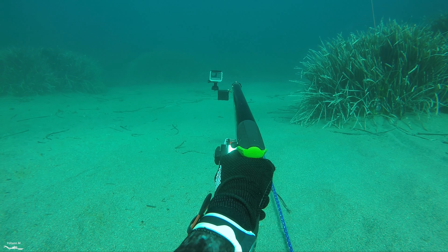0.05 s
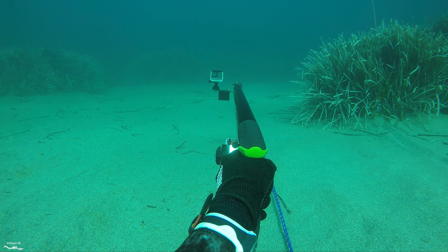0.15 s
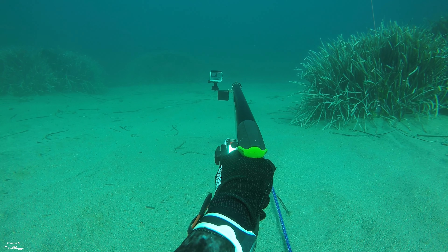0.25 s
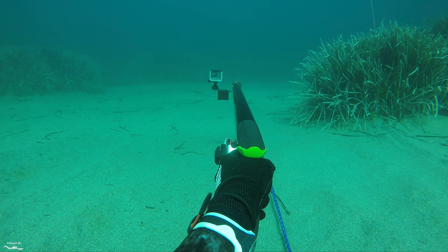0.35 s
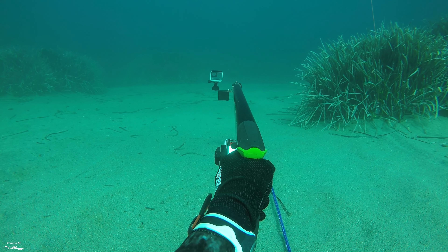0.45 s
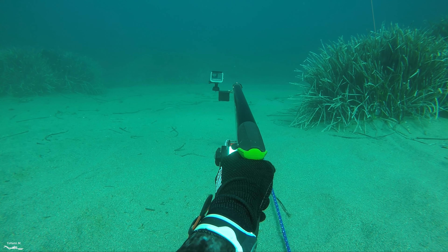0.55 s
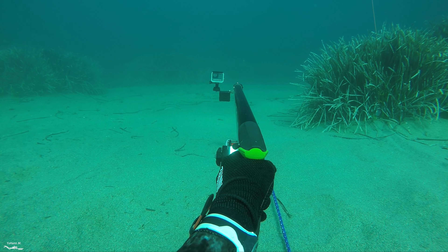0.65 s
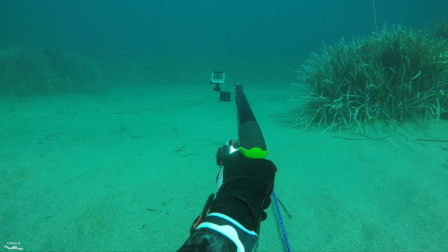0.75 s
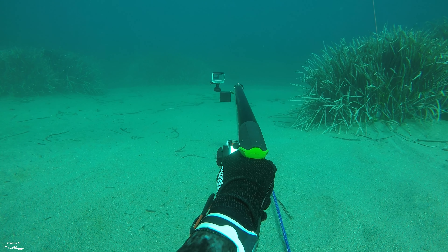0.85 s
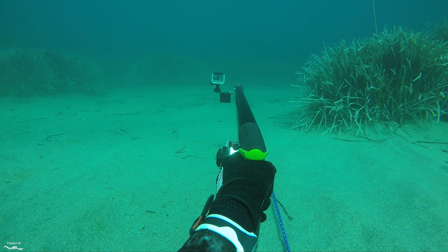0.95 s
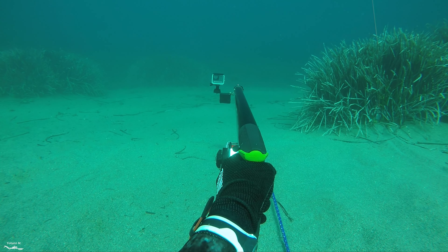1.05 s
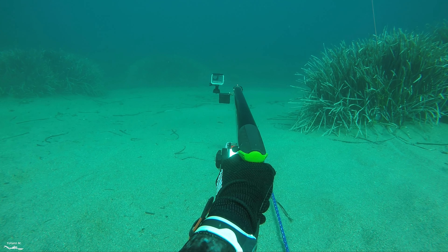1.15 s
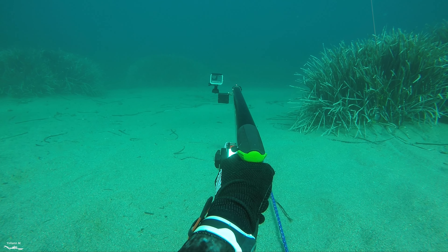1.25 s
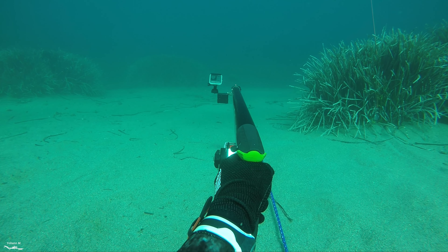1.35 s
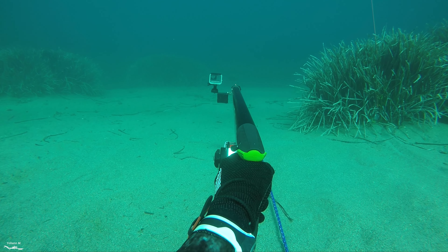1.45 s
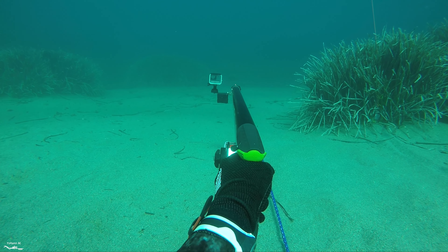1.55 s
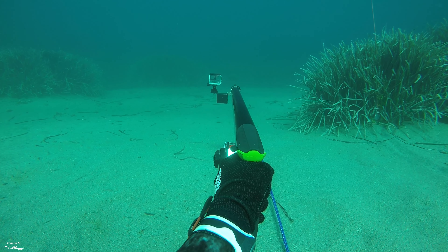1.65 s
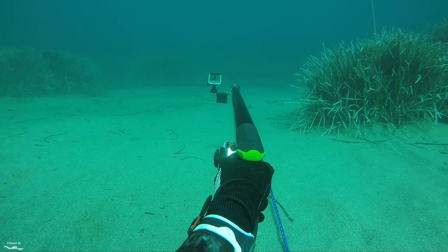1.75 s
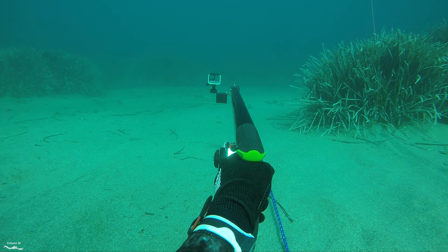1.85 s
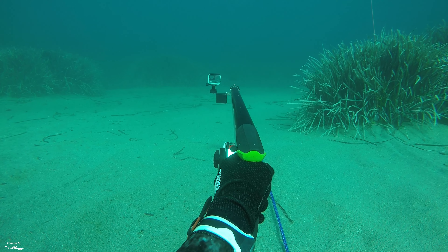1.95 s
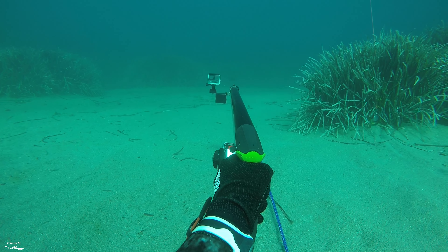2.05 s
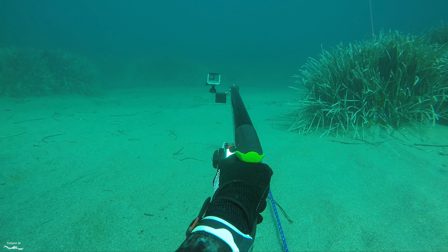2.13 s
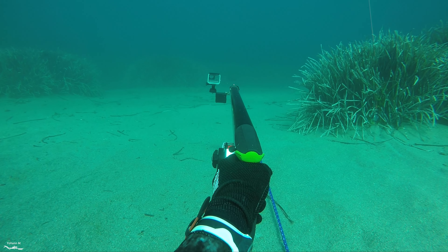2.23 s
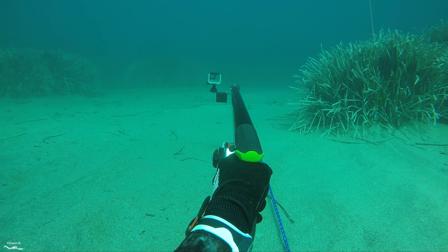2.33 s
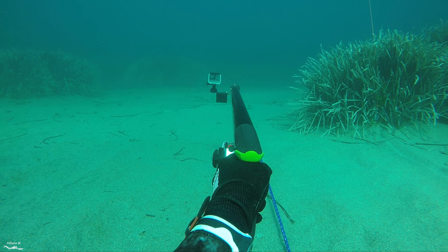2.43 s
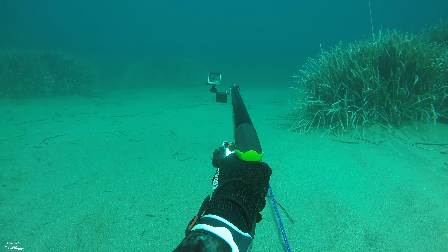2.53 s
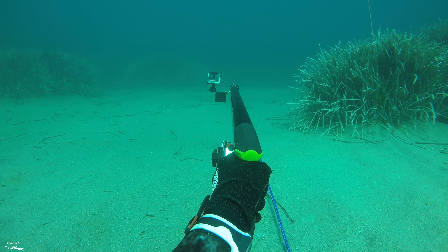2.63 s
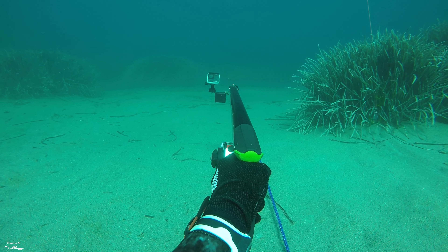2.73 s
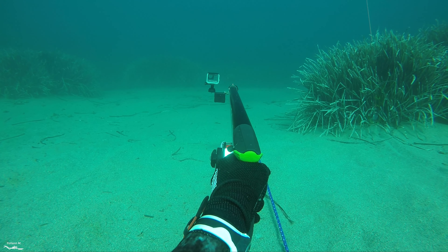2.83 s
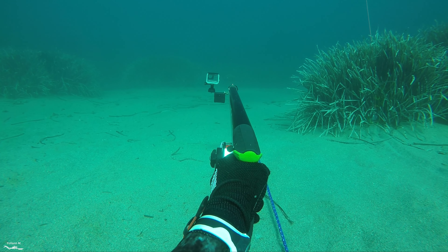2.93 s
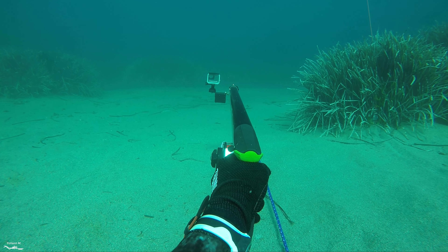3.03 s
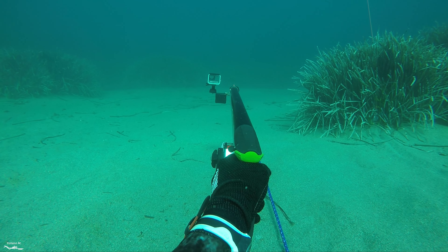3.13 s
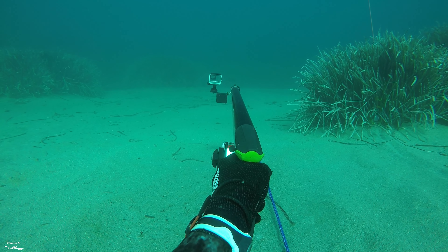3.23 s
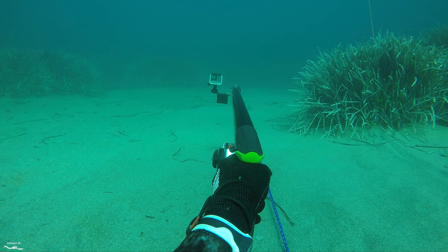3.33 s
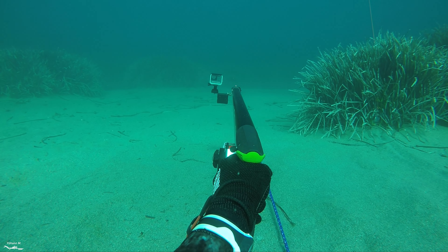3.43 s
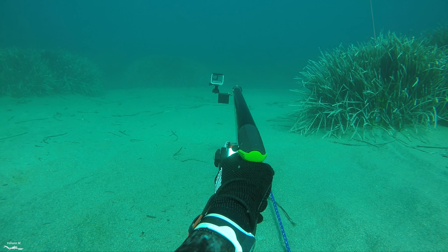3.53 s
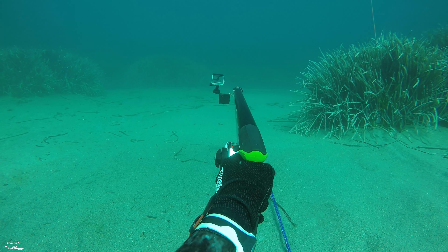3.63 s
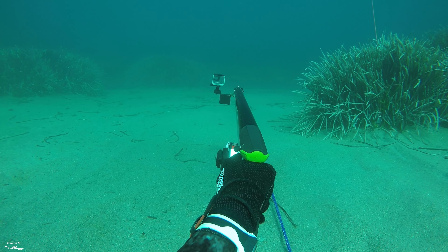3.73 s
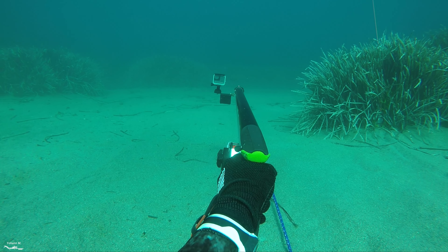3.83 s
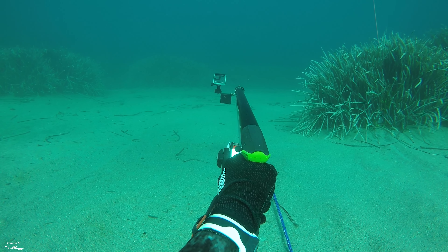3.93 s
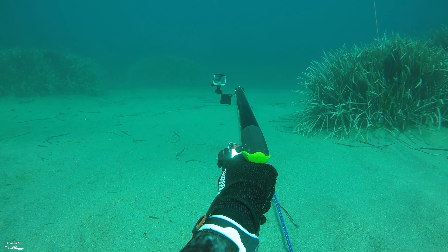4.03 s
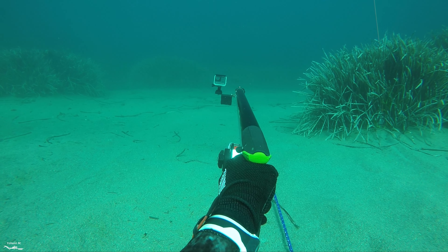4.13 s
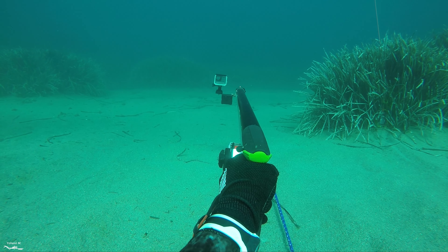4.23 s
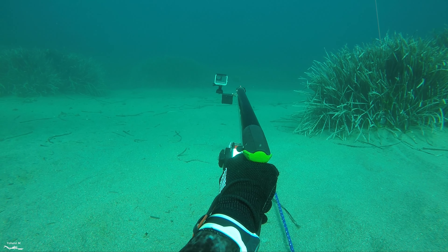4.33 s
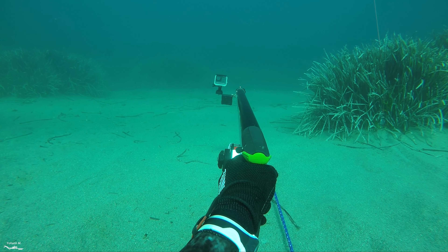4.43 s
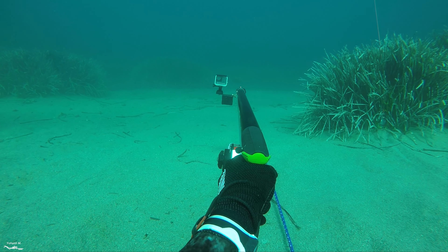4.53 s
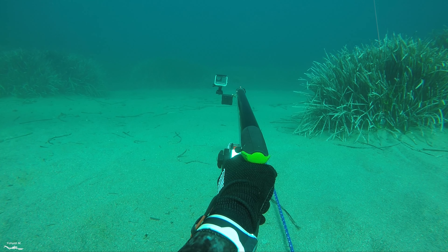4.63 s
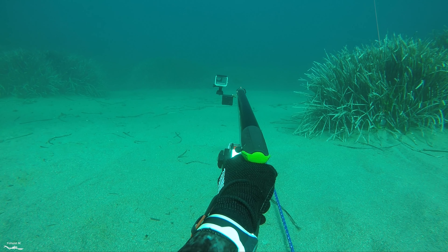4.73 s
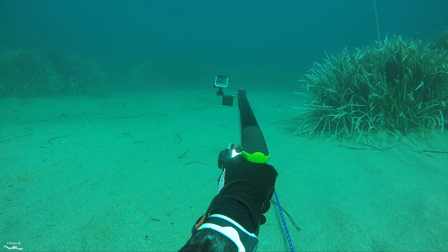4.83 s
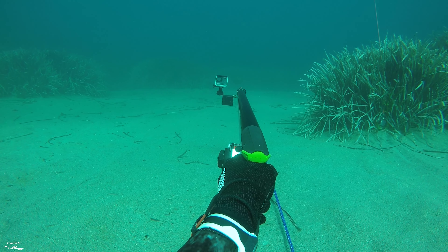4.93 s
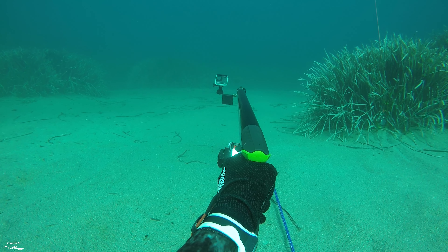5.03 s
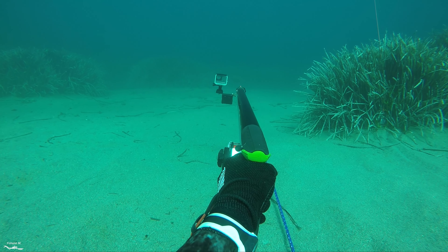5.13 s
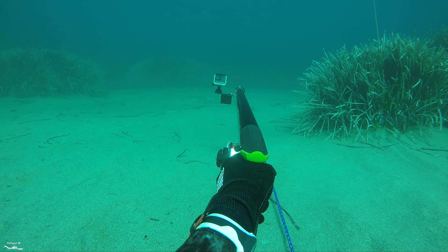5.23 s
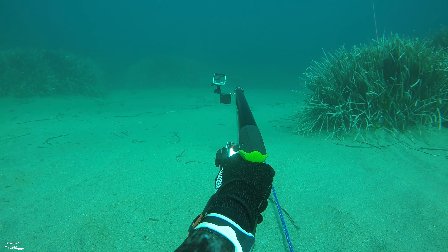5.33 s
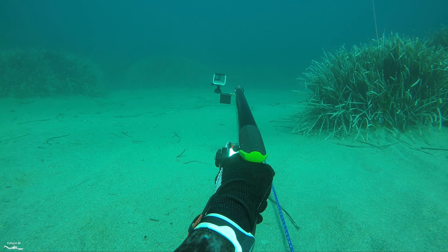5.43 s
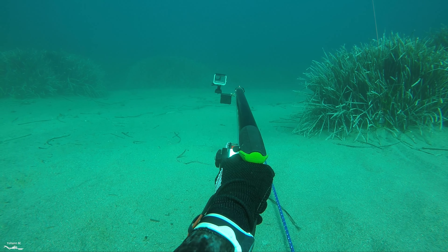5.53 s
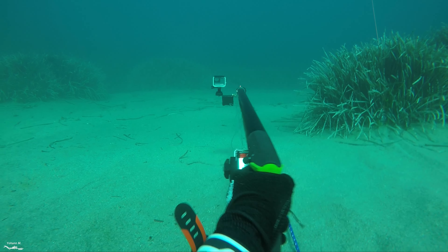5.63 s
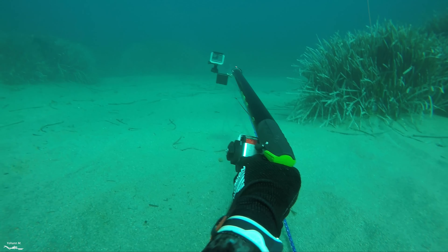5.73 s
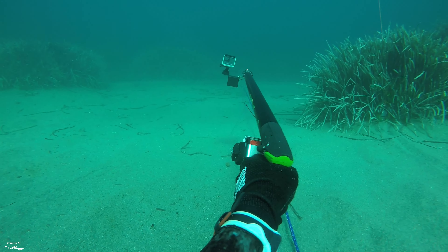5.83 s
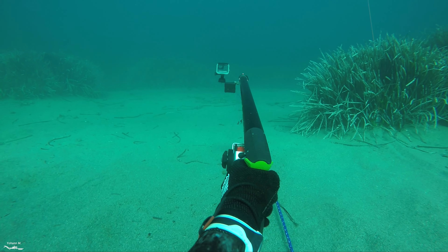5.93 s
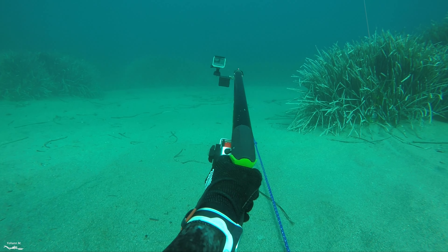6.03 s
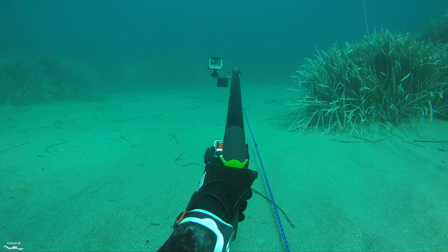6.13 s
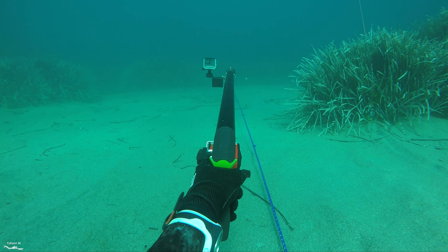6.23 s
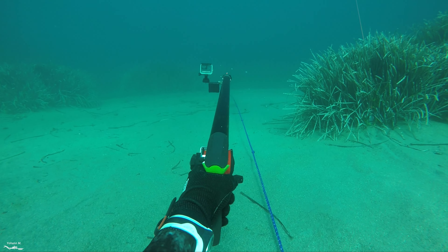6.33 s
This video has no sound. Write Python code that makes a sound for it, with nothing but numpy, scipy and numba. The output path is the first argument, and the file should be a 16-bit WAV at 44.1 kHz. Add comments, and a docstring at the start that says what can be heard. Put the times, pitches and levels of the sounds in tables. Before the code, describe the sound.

Underwater near a sandy bed, shrimp crackle over a low watery rumble until a speargun clicks and fires with a hard, overloaded metallic crack.

```python
"""Over a sandy sea bed, one microphone in a waterproof housing hears shrimp snap near and far.
Water surges and gurgles, a thin whirr passes at the start, a hum wavers faintly, and bumps touch the housing.
Late on, an underwater speargun's trigger clicks, the gun recoils and the shaft scrapes along its rail.
A hard crack overloads the microphone; the line rattles out and the gun rings while gain control holds the sea down.
Blows, scrapes and snaps are shaped noise through the housing's resonances; rings and sways are fading modes."""
import sys
import numpy as np
from scipy import signal
from scipy.fft import rfft, irfft
from scipy.io import wavfile
from scipy.ndimage import uniform_filter1d
from numba import njit

SR = 44100
rng = np.random.default_rng(int(sys.argv[2]) if len(sys.argv) > 2 else 0)


def to_wav(s):
    """Save 16-bit WAV."""
    ch = np.atleast_2d(s).T  # columns
    pcm = np.round(np.clip(ch, -1, 1) * 32767)  # PCM
    wavfile.write(sys.argv[1], SR, pcm.astype(np.int16))


N = 280917
TIME = np.arange(N) / SR
RECOIL_S, CRACK_S = 5.6585, 5.726

# metal blows in the gun: start_s, impact_db (peak), contact_s (decay),
# body_db and treble_db (relative, before the offsets shared by all blows)
GUN_BLOWS = [(5.6343, -39, .001, -23, 0), (5.642, -38.5, .002, -18, -5), (5.656, -29, .0024, -14.5, -4),
             (5.6597, -12.5, .0025, -10.5, -8), (5.7254, 7, .0012, -9, -4.5), (5.727, 6, .0035, -1, -4.5),
             (5.8302, -28, .001, -27, 2), (5.847, -36.5, .0008, -13, -14)]
# hollow knock of the barrel: pitch_hz, t60_s, level_db (relative)
BARREL_MODES = [(417, 0.031, 0.5), (546, 0.026, -2.5), (890, .022, -11.5), (1100, 0.033, -19),
                (1318, 0.026, -10.5)]
# lasting ring of the gun: pitch_hz, t60_s, level_db (relative)
GUN_RING = [(429.4, .14, -2.5), (890, .1, -13), (1570, 0.098, -8.5), (2066, 0.062, 1.5), (2260, .11, -1.5),
            (2570, .1, -4), (2720, .1, -7.5), (3600, .11, -9), (3620, 0.098, -8), (5210, .1, -16),
            (6440, .07, -12)]


def blows(ring_db=-32, rough_db=-13, top_db=-2, knock_db=-3):
    """Metal hits metal: a sharp impact and a rough contact shake the housing, the barrel knocks and rings on."""
    out, t = np.zeros(N), TIME[:SR // 3]
    knock = struck(BARREL_MODES, t)
    gun_ring = struck(GUN_RING, t)
    for start_s, impact_db, contact_s, body_db, treble_db in GUN_BLOWS:
        roughness = rng.standard_normal(len(t)) * burst(t, contact_s)
        contact = signal.unit_impulse(len(t)) + undb(rough_db) * roughness
        shade = [(400, -4), (1600, -9), (2200, 3), (3600, treble_db - 3), (7000, top_db + treble_db / 2)]
        impact = peak(colour(housing(contact), shade), 0)
        hit = impact + undb(body_db + knock_db) * knock + undb(ring_db) * gun_ring
        add(out, start_s, undb(impact_db) * hit)
    return out


def shaft(start_s=5.66, rise_s=.02, hold_s=.024, release_s=.011, level_db=-31):
    """The shaft gathers speed, scrapes brightly along the rail and leaves it: loudness follows speed and contact."""
    age = TIME - start_s
    speed = np.clip(age / rise_s, 0, 1)
    contact = np.exp(-np.maximum(age - rise_s - hold_s, 0) / release_s)
    scrape = rub([(500, 1), (900, -1), (1500, -2), (2500, 2), (4200, 5), (7500, 1.5), (11000, 6), (14000, 9)])
    return undb(level_db) * speed * contact * scrape


def line(whip_db=-15, whip_decay_s=.006, run_db=-29.5, run_decay_s=.044):
    """The line whips out at the crack, then runs ever slower: a duller rattle with a fast and a slow fade."""
    age = TIME - CRACK_S
    pull = undb(whip_db) * burst(age, whip_decay_s) + undb(run_db) * burst(age, run_decay_s)
    return pull * rub([(420, 4), (900, -3.5), (2500, -2), (4200, -4), (11000, -3)])


# low swings of gun and housing after the crack: pitch_hz, t60_s, level_db (before a 220 Hz low-pass)
JOLT_MODES = [(27, 0.84, -19.5), (61.4, 0.11, -9.5), (129, 0.037, 7), (113, .2, -15), (166, 2.6, -37.5)]


def recoil():
    """The gun kicks back and sways, jolts again at the crack, and is left with a low ring."""
    out, t = np.zeros(N), TIME[:SR]
    add(out, RECOIL_S, thump(level_db=-1, edge_hz=110, sway_hz=23.3))
    # the sway swells in over a few milliseconds
    sway = ring(20, 0.29, t) * (1 - burst(t, 0.0044))
    add(out, RECOIL_S + 0.011, undb(-5.5) * sway)
    jolt = sum(undb(level_db) * ring(hz, t60_s, t) for hz, t60_s, level_db in JOLT_MODES)
    add(out, CRACK_S, cut(jolt, 220, "low", order=4))
    return out


# the claw shuts this long before its bubble collapses
CLAW_LEAD_S = .0032
# snaps of the nearest shrimp: collapse_s, level_db (nominal peak, before a shared trim), treble_db (share)
NEAR_SNAPS = [(0.2942, -35.5, -26), (0.6125, -36, -17), (0.6913, -37.5, -14), (0.7253, -34, -24),
              (0.8932, -34, -29), (0.9577, -30.5, -17), (1.1303, -24.5, -28), (1.3838, -30, -26),
              (1.4097, -25.5, -27), (1.4421, -27, -26), (1.516, -25, -28), (1.6157, -31, -23),
              (1.8307, -26, -21), (1.8404, -29, -18), (1.9535, -29, -25), (1.9694, -26.5, -28),
              (2.0677, -30.5, -19.5), (2.0872, -29, -22), (2.1734, -33.5, -31), (2.2393, -36, -20),
              (2.4074, -31, -20), (2.4274, -33.5, -22), (2.5112, -34, -21), (2.6638, -31, -24),
              (2.6988, -30.5, -26.5), (2.9083, -34, -24), (3.045, -36.5, -20), (3.0679, -35, -20),
              (3.1218, -36, -25), (3.3212, -37, -23), (3.3548, -26.5, -20), (3.3777, -29, -16.5),
              (3.5228, -34, -32), (3.6496, -34, -17), (3.69, -29, -33), (3.8731, -36.5, -14),
              (3.9644, -35, -21), (4.2298, -33, -27.5), (4.578, -36, -18), (4.6828, -27.5, -26.5),
              (5.1442, -35, -29), (5.231, -38, -14), (5.2654, -29.5, -20.5), (5.3632, -26.5, -29.5),
              (5.4435, -30, -29), (5.471, -33, -26), (5.5218, -34, -27.5)]


def near_shrimp(trim_db=-1.83):
    """Single snaps that stand out close to the microphone, each with its own level and brightness."""
    out = np.zeros(N)
    times, levels_db, trebles_db = np.transpose(NEAR_SNAPS)
    for collapse_s, level_db, snap in zip(times, levels_db, snaps(trebles_db)):
        add(out, collapse_s - CLAW_LEAD_S, undb(level_db + trim_db) * snap)
    return out


def far_shrimp(rate=150, nearest_db=-41.5, far_db=-54.5, dull_db=-28, bright_db=-15, count=32):
    """Many shrimp spread evenly over the bed, about rate snaps a second; each weakens with its distance."""
    out = np.zeros(N)
    for snap in snaps(np.linspace(dull_db, bright_db, count)):
        when, area = rng.random((int(rate * N / SR / count), 2)).T
        # an even spread over the area makes distance its square root
        distance = np.sqrt(area)
        clicks = np.zeros(N)
        clicks[(when * N).astype(int)] = np.minimum(undb(far_db) / distance, undb(nearest_db))
        out += signal.oaconvolve(clicks, snap)[:N]
    return out


def snaps(trebles_db, decay_s=0.00042, echo_db=-23, echo_s=0.016, claw_db=-16, bounce_db=-11,
          usual_db=-25, crest_db=18, size=2048):
    """One snap per brightness: the claw clicks shut, its bubble collapses, the sea bed bounces and scatters it."""
    age = TIME[:size] - CLAW_LEAD_S
    lag_s = rng.uniform(0.00105, 0.00605, (len(trebles_db), 1))
    claw = undb(claw_db) * burst(age + CLAW_LEAD_S, decay_s)
    collapse = burst(age, decay_s)
    bed = undb(echo_db) * burst(age, echo_s) + undb(bounce_db) * burst(age - lag_s, decay_s)
    rung = housing((claw + collapse + bed) * rng.standard_normal(bed.shape))
    out = []
    for x, tilt in zip(rung, np.asarray(trebles_db) - usual_db):
        # a brighter snap gains treble and loses some of its middle
        shade = [(500, -31.5), (1400, -13.5), (2200, 1 - .4 * tilt), (3600, 1),
                 (5600, 1.1 * tilt + 1), (9000, .7 * tilt - 1.5)]
        out.append(level(colour(x, shade, size=512), -crest_db))
    return out


# soft bumps on the housing: start_s, level_db (peak), edge_hz (upper edge)
HOUSING_BUMPS = [(0.104, -35, 65), (0.788, -17, 133), (.964, -31.5, 59.6), (1.728, -20.5, 130),
                 (2.834, -37.5, 75), (3.305, -36.5, 117)]


def bumps():
    """Soft low pushes against the housing."""
    out = np.zeros(N)
    for start_s, level_db, edge_hz in HOUSING_BUMPS:
        add(out, start_s, thump(level_db, edge_hz))
    return out


# small dull knocks: start_s, level_db (peak, before a shared trim)
HOUSING_KNOCKS = [(0.704, -47.5), (1.602, -45), (3.463, -42.5), (3.523, -42), (3.634, -48), (5.52, -46.5)]


def knocks(pitch_hz=520, touch_s=0.0065, trim_db=1):
    """Small dull knocks on the housing: a fading noisy touch drives one short mode."""
    out, t = np.zeros(N), TIME[:SR // 10]
    for start_s, level_db in HOUSING_KNOCKS:
        touch = rng.standard_normal(len(t)) * np.exp(-t / touch_s)
        knock = signal.fftconvolve(touch, ring(pitch_hz, 0.017, t))
        add(out, start_s, peak(knock, level_db + trim_db))
    return out


# spectrum of the open water: pitch_hz, level_db (relative, per Hz)
WATER_SPECTRUM = [(15, 0), (33, -0.5), (48, -4.5), (70, -15.5), (110, -16.5), (180, -20.5), (230, -28.5),
                  (330, -35), (560, -30), (800, -38), (1080, -38.5), (1250, -34), (1450, -38.5),
                  (15000, -51)]


def water(level_db=-43.5):
    """Surging water around the housing: coloured noise whose level wanders."""
    noise = colour(rng.standard_normal(N), WATER_SPECTRUM, size=8192)
    return level(noise, level_db) * undb(walk(9))


def gurgle(rate=70, centre_hz=510, spread=.15, cycles=8, level_db=-64):
    """Small dull blips of moving water, rate a second, each a few cycles long."""
    out, t = np.zeros(N), TIME[:SR // 20]
    for when, pitch, size in rng.random((int(rate * N / SR), 3)):
        hz = centre_hz * (1 + spread) ** (4 * pitch - 2)
        # the blip fades in over its first cycle
        blip = ring(hz, cycles / hz, t) * np.minimum(t * hz, 1)
        add(out, when * N / SR, blip / np.sqrt(size + 0.016))
    return level(out, level_db)


# level of the low hum: time_s, level_db (before a shared trim and a slow waver)
HUM_COURSE = [(0, -59.5), (2.5, -62), (3.4, -54), (4.8, -51.5), (5.7, -57), (6.37, -49.5)]


def hum(centre_hz=134.4, trim_db=-1.5):
    """A faint low tone whose pitch and level waver."""
    pitch_hz = centre_hz * (1 + .025 * walk(11))
    phase = 2 * np.pi * np.cumsum(pitch_hz) / SR
    return np.sin(phase) * undb(curve(HUM_COURSE) + trim_db + 2 * walk(3.3))


def whirr():
    """A brief thin whirr at the start: noise through one mode, swelling and fading."""
    noise = signal.fftconvolve(rng.standard_normal(N), ring(1230, 0.036, TIME[:SR // 10]))[:N]
    return level(noise, -62) * np.exp(-((TIME - .16) / 0.05) ** 2)


# resonances of the housing around the microphone: pitch_hz, width_hz, level_db
HOUSING_MODES = [(448, 100, 6), (587, 73, 1), (897, 66, -1.5), (1270, 88, -8), (1620, 50, -15.5),
                 (1767, 39, -11.5), (2123, 100, 2.5), (2310, 110, 0.5), (2587, 180, 3), (2992, 390, -5),
                 (3650, 235, 4), (4110, 110, -11.5), (4197, 150, -3.5), (4617, 210, -9), (5130, 93, -16.5),
                 (5677, 420, -9), (6410, 680, -15), (8040, 770, -16), (9310, 420, -14.5), (10960, 880, -19),
                 (14800, 1000, -23)]


def housing(x):
    """The housing rings with what reaches it; neighbouring modes swing in opposite senses."""
    t = TIME[:SR // 20]
    response = np.zeros(len(t))
    for k, (hz, width_hz, level_db) in enumerate(HOUSING_MODES):
        # a wider resonance fades sooner
        mode = ring(hz, np.log(1000) / (np.pi * width_hz), t)
        response += (-1) ** k * undb(level_db) * width_hz * mode
    response *= 2 * np.pi / SR
    rung = signal.oaconvolve(np.atleast_2d(x), response[None], axes=1)
    return rung[:, :np.shape(x)[-1]].reshape(np.shape(x))


def rub(tilt, grain_db=3.5):
    """Tiny uneven slips, heard through the housing."""
    slips = rng.standard_normal(N) * undb(grain_db * walk(700))
    return level(colour(housing(slips), tilt), 0)


def thump(level_db, edge_hz, sway_hz=26, size=16384):
    """A pressure push: a quick swing first, then ever slower sways."""
    push = cut(signal.unit_impulse(size), edge_hz, "low", order=5)
    return peak(cut(push, sway_hz, "high", order=5), level_db)


def struck(modes, t):
    """A set of (pitch_hz, t60_s, level_db) modes; neighbours swing in opposite senses."""
    return sum((-1) ** k * undb(db) * ring(hz, t60_s, t) for k, (hz, t60_s, db) in enumerate(modes))


def ring(hz, t60_s, t):
    """One struck mode, 60 dB down after t60_s."""
    return np.sin(2 * np.pi * hz * t) * np.exp(-np.log(1000) * t / t60_s)


def burst(age, decay_s):
    """A sudden start and an exponential fade."""
    return (age >= 0) * np.exp(-np.abs(age) / decay_s)


def walk(rate):
    """Smooth random drift with a spread of 1, taking rate steps a second."""
    k = int(SR / rate)
    steps = np.repeat(rng.standard_normal(N // k + 1), k)
    return level(uniform_filter1d(uniform_filter1d(steps, k), k)[:N], 0)


def colour(x, points, size=2048):
    """Causal minimum-phase filter with a spectrum of (pitch_hz, level_db) points."""
    hz, db = np.transpose(points)
    grid = np.maximum(np.fft.rfftfreq(size, 1 / SR), 1)
    cepstrum = irfft(np.log(undb(np.interp(np.log(grid), np.log(hz), db))))
    # folding the cepstrum forward in time makes the filter causal
    cepstrum[1:size // 2] *= 2
    cepstrum[size // 2 + 1:] = 0
    response = irfft(np.exp(rfft(cepstrum)))
    return signal.fftconvolve(x, response)[:len(x)]


def cut(x, hz, kind, order=2):
    """Low-pass or high-pass."""
    return signal.sosfilt(signal.butter(order, hz, kind, fs=SR, output="sos"), x)


def undb(db):
    """Decibels to gain."""
    return 10 ** (np.asarray(db) / 20)


def level(x, db):
    """Scale to a level in dB, taken as the spread about the mean."""
    return x * undb(db) / np.std(x)


def peak(x, db):
    """Scale to a peak level in dB."""
    return x * undb(db) / np.abs(x).max()


def curve(rows):
    """Join (time_s, value) rows by straight lines."""
    return np.interp(TIME, *np.transpose(rows))


def add(out, start_s, x):
    """Mix x into out at start_s."""
    i = int(np.clip(start_s * SR, 0, N - 1))
    out[i:i + len(x)] += x[:N - i]


def scene():
    """Everything that reaches the microphone, from the gun to the open water."""
    gun = blows() + shaft() + line() + recoil()
    shrimp = near_shrimp() + far_shrimp()
    handling = bumps() + knocks()
    background = water() + gurgle() + hum() + whirr()
    return (gun + shrimp + handling + background)[None]


@njit
def follow(x, attack, release):
    """Envelope that rises and falls at different speeds."""
    out, e = np.empty(len(x)), 0.
    for i in range(len(x)):
        e += (x[i] - e) * (attack if x[i] > e else release)
        out[i] = e
    return out


def record(dry, threshold_db=-27, attack_s=0.011, release_s=3.0, slope=0.39, order=8, top_hz=15700):
    """The microphone overloads on peaks; gain control, deaf to the bass, ducks after them and recovers slowly."""
    x = dry[0] / (1 + np.abs(dry[0]) ** order) ** (1 / order)
    heard = np.abs(cut(x, 300, "high", order=4))
    envelope = follow(heard, 1 / (attack_s * SR), 1 / (release_s * SR))
    # slope is the dB of ducking per dB above the threshold
    duck_db = slope * 20 * np.log10(np.maximum(envelope / undb(threshold_db), 1))
    x = x * undb(-cut(duck_db, 3.1, "low", order=1))
    # nothing passes far above top_hz
    return signal.sosfilt(signal.ellip(10, .2, 95, top_hz, fs=SR, output="sos"), x)[None]


dry = scene()
out = record(dry)
to_wav(out)
```